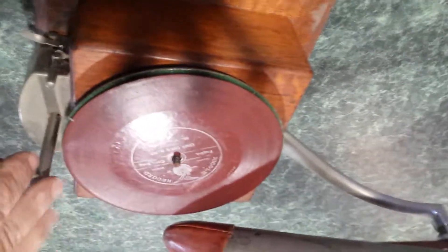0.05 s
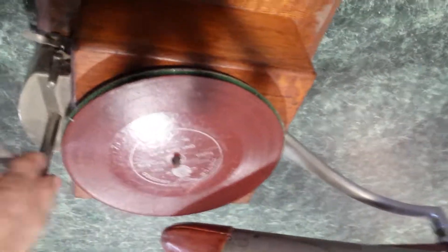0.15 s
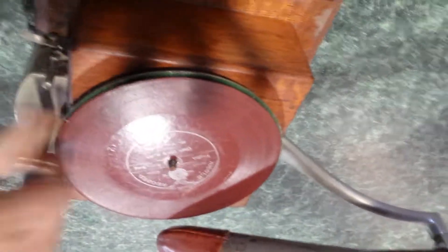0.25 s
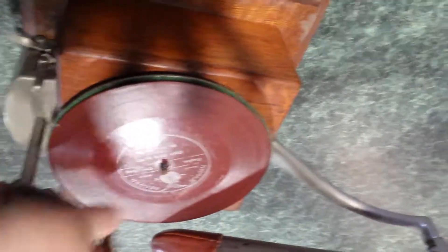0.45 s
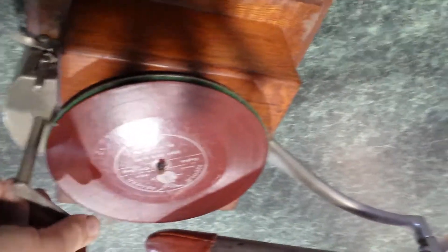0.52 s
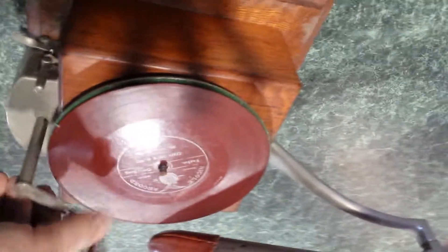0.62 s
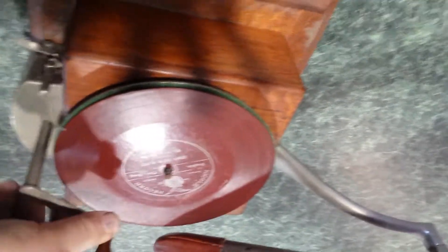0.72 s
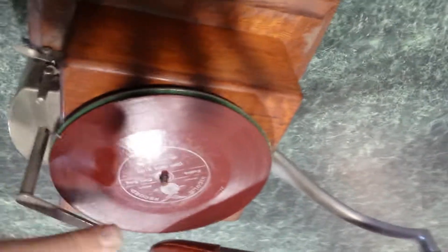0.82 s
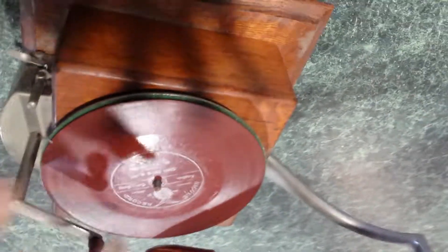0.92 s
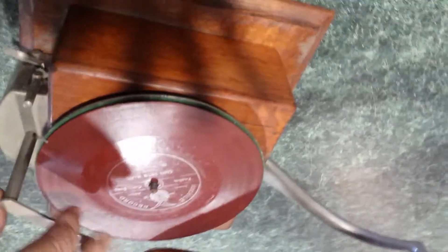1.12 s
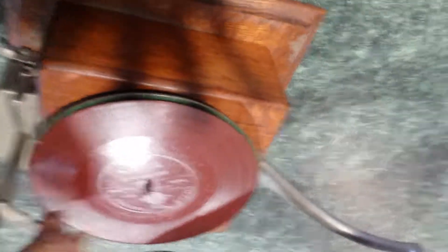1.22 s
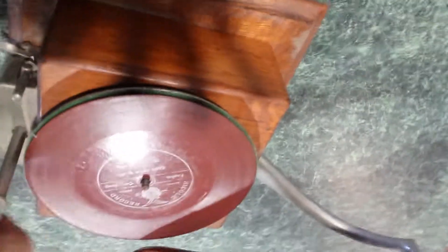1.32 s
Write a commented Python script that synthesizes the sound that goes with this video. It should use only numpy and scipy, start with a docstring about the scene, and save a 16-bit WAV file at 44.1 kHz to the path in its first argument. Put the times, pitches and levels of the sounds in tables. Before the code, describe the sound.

Sharp ratchet clicks from a wind-up gramophone being cranked, ending in one heavy clack.

```python
"""In a small quiet room, the crank of a wind-up gramophone is turned close by.
A steel pawl snaps over the ratchet teeth; each impact chatters and excites briefly ringing modes.
The wooden case creaks under the load of the spring, and the mechanism catches with one heavy clack.
The gears rumble softly while the hand turns, the handle ticks in its play, and the case bumps once more."""
import sys
import numpy as np
from scipy import signal
from scipy.fft import rfft, irfft
from scipy.io import wavfile
from scipy.ndimage import uniform_filter1d, minimum_filter1d

SR = 44100
rng = np.random.default_rng(int(sys.argv[2]) if len(sys.argv) > 2 else 0)


def wrap_up_sound(samples):
    """Save the sound to the file named by the first command line argument, as 16-bit audio."""
    columns = np.atleast_2d(samples).T
    # keep every value between -1 and 1, then stretch to whole-number steps
    tamed = np.clip(columns, -1, 1)
    steps = np.round(tamed * 32767).astype(np.int16)
    wavfile.write(sys.argv[1], SR, steps)


N = 59535
FREQS_HZ = np.maximum(np.fft.rfftfreq(N, 1 / SR), 1)


def undb(db):
    """Amplitude ratio of a level in decibels."""
    return 10 ** (np.asarray(db) / 20)


def since(start):
    """Elapsed time in seconds, zero before the start."""
    return np.maximum(np.arange(N) / SR - start, 0)


def fade(t, t60):
    """Exponential damping: the level falls 60 dB in t60 seconds."""
    return np.exp(-np.log(1000) * t / max(t60, 1e-4))


def noise(spectrum, top_db=0, edge_hz=8700, edge_width_hz=1200):
    """Spectral shaping: unit-variance noise with a given spectrum and a treble shelf."""
    hz, db = np.array(spectrum).T
    shelf_db = top_db * np.clip((FREQS_HZ - edge_hz) / edge_width_hz + .5, 0, 1)
    gain = undb(np.interp(np.log(FREQS_HZ), np.log(hz), db) + shelf_db)
    shaped = irfft(rfft(rng.standard_normal(N)) * gain, N)
    return shaped / shaped.std()


def contact(start, hold, t60, rise=0.00049):
    """Envelope of an impact: linear rise, hold, exponential decay (times in seconds)."""
    t = since(start)
    return np.minimum(t / rise, 1) * fade(np.maximum(t - hold, 0), t60)


def ring(start, modes, rise, scatter_db=0, detune=0.0043):
    """Modal superposition: damped sinusoids, randomly detuned, build up during the contact."""
    t, out = since(start), 0
    for hz, db, t60 in modes:
        level_draw, pitch_draw, phase = rng.standard_normal(3)
        tone = np.sin(2 * np.pi * (hz * (1 + detune * pitch_draw) * t + phase))
        out = out + undb(db + scatter_db * level_draw) * tone * fade(np.maximum(t - rise, 0), t60)
    return out * np.minimum(t / rise, 1)


# spectrum of the room's background noise (frequency [Hz], level [dB])
AMBIENT_SPECTRUM = [(25, -21.5), (60, -6), (125, 2.5), (350, -6.5), (700, -5.5), (1100, -13.5), (1600, -14),
                    (3000, -19.5), (6400, -16.5), (9000, -31), (15000, -37)]

def ambient_noise():
    """Stationary noise: a faint floor, strongest in the bass."""
    return undb(-53) * noise(AMBIENT_SPECTRUM)


# reverberation bands (centre frequency [Hz], level [dB], t60 [s])
REVERB_BANDS = [(150, -13, 0.39), (398, -9, 0.24), (920, -6, 0.3), (1940, -11, 0.35), (4500, -11, 0.37),
                (6440, -13, 0.36), (9400, -15.5, 0.23), (14100, -11.5, 0.31)]

def room(direct, delay_s=0.0057):
    """Reverberation: early reflections from case and floor, then a diffuse tail decaying band by band."""
    t, late = since(0), since(delay_s)
    white, tail = rfft(rng.standard_normal(N)), 0
    log_centres = np.log([hz for hz, _, _ in REVERB_BANDS])
    for (_, db, t60), selector in zip(REVERB_BANDS, np.eye(len(REVERB_BANDS))):
        band = irfft(white * np.interp(np.log(FREQS_HZ), log_centres, selector), N)
        decay = fade(late, t60) * (late > 0)
        tail = tail + undb(db) * band * decay / np.linalg.norm(decay)
    spikes = rng.standard_normal(N) ** 3  # cubing leaves a few strong reflections
    early = spikes * fade(t, t60=0.025) * (t > delay_s / 2)
    impulse_response = tail + undb(-12.5) * early / np.linalg.norm(early)
    return direct + signal.fftconvolve(direct, impulse_response)[:N]


# spectrum of gears and shaft (frequency [Hz], level [dB])
GEAR_SPECTRUM = [(30, -29.5), (70, -3), (130, 2.5), (330, 1.5), (600, -12), (1200, -9.5), (2500, -18),
                 (4200, -22), (6400, -12), (8500, -26.5), (15000, -39)]
# their loudness as the crank moves (time [s], level [dB])
GEAR_ENVELOPE = [(0, -44.5), (.07, -43), (0.122, -45), (.2, -41.5), (.34, -44.5), (.65, -46.5), (.9, -46.5),
                 (1.0, -59), (1.131, -56.5), (1.17, -43.5), (1.26, -51.5), (1.35, -52.5)]

def gears():
    """Amplitude-modulated noise: the winding gears rumble and the shaft hisses, unevenly."""
    times, db = np.array(GEAR_ENVELOPE).T
    uneven = uniform_filter1d(rng.standard_normal(N), size=600)
    flutter_db = 1.5 * uneven / uneven.std()
    return noise(GEAR_SPECTRUM) * undb(np.interp(since(0), times, db) + flutter_db)


# light taps of the handle (time [s], level [dB], centre frequency [Hz])
HANDLE_TAPS = [(0.1674, -29, 1630), (0.2513, -34.5, 5000), (.284, -45, 7000), (0.528, -35, 930),
               (1.017, -52, 6000), (1.025, -47, 1140)]

def handle_taps(skirt_db=-22):
    """Backlash: play in the handle makes faint ticks, each a damped band of noise."""
    out = 0
    for start, db, hz in HANDLE_TAPS:
        band = [(hz / 4, skirt_db / 2), (hz, 0), (hz * 2, skirt_db), (hz * 4, 2 * skirt_db)]
        out = out + undb(db) * noise(band) * contact(start, hold=0.0014, t60=0.063)
    return out


# dull knocks of the case (time [s], level [dB], rise [s], t60 [s], panel mode gain [dB])
CASE_KNOCKS = [(.033, -44.5, 0.0045, 0.07, 7.5), (.064, -42.5, 0.0055, 0.034, 4),
               (.692, -32, 0.024, 0.17, 2.5), (1.157, -39, 0.0026, 0.21, -24)]
# low modes of the wooden body (frequency [Hz], level [dB], multiple of the knock's t60 [1])
BODY_RESONANCES = [(130.5, 0.5, 1), (147, 0.5, 0.84), (194.5, -2, 0.91), (243.5, -5, 0.94)]
# higher modes of its panels (frequency [Hz], level [dB], multiple of the knock's t60 [1])
PANEL_RESONANCES = [(352, -14, 3), (430, -8, 0.28), (510.6, -0.5, 0.37), (602, -9.5, 2.3)]

def case_knocks():
    """Modal excitation: the case rocks under the hand, and soft pushes ring its body and panels."""
    out = 0
    for start, level_db, rise, t60, panel_db in CASE_KNOCKS:
        body = [(hz, db, t60 * factor) for hz, db, factor in BODY_RESONANCES]
        panels = [(hz, db + panel_db, t60 * factor) for hz, db, factor in PANEL_RESONANCES]
        out = out + undb(level_db) * ring(start, body + panels, rise, scatter_db=-1.5, detune=0.0068)
    return out


# spectrum of the creaking wood (frequency [Hz], level [dB])
CREAK_SPECTRUM = [(50, -31), (125, 6.5), (210, -5), (320, -23), (430, -20), (510, 0), (620, 1.5),
                  (760, -9.5), (1300, -17), (3000, -21), (6000, -25), (12000, -43)]

def case_creak(peak_s=0.704, width_s=0.017):
    """Friction: wood rubs briefly as the spring loads the case before the catch."""
    swell = np.exp(-.5 * ((since(0) - peak_s) / width_s) ** 2)
    return undb(-31.5) * noise(CREAK_SPECTRUM) * swell


# the heavy catch and its rebound (time [s], level [dB], hold [s])
CATCH_IMPACTS = [(0.7587, -6.5, 0.0043), (0.7735, -23, 0.014)]
# spectrum of that contact (frequency [Hz], level [dB])
CATCH_SPECTRUM = [(150, -34), (300, 7), (480, -3), (850, 1), (1150, -12.5), (2000, -1.5), (3000, -3.5),
                  (5500, 2), (8400, 0), (9300, -9.5), (11500, -17.5), (15000, -32)]
# modes of crank and case (frequency [Hz], level [dB], t60 [s])
CRANK_MODES = [(304, -10, 0.17), (595, -16, .04), (774, -10.5, 0.024), (937, -12.5, 0.035),
               (1360, -7, 0.048), (1851, -0.5, 0.019), (2155, -6.5, 0.054), (2280, -25, 0.033),
               (2805, -5.5, 0.037), (3350, -16, 0.026), (4744, 5.5, .022), (5618, 10, 0.01),
               (6580, -6, 0.024), (8208, -1.5, 0.014), (8395, -1.5, .025)]

def catch(ring_start_s=.761):
    """Impact and rebound: the mechanism catches hard, ringing crank and case and shaking loose parts."""
    clack = sum(undb(db) * noise(CATCH_SPECTRUM) * contact(start, hold, t60=0.011, rise=0.0032)
                for start, db, hold in CATCH_IMPACTS)
    buzz = undb(-23.5) * noise(CATCH_SPECTRUM, top_db=-6) * contact(ring_start_s, hold=0.0068, t60=0.33)
    ringing = undb(-12) * ring(ring_start_s, CRANK_MODES, rise=0.0015)
    return clack + buzz + ringing


# spectrum of the case shaken by a snap (frequency [Hz], level [dB])
WOOD_SPECTRUM = [(100, -17), (200, -3), (500, -6.5), (630, -6.5), (820, -3), (1130, -6.5), (1450, -5.5),
                 (2400, -9), (3500, -4), (6000, -20), (12000, -38)]
# modes of the side wall that carries the crank (frequency [Hz], level [dB], t60 [s])
SIDE_WALL_MODES = [(642, 0, 0.077), (766, -3, 0.059), (1420, 4.5, .04), (1790, 1, .035)]

def case_response(start, rise_s=0.0043):
    """Structure-borne sound: the wooden body and side wall radiate a snap of the pawl."""
    body = undb(-28.5) * noise(WOOD_SPECTRUM) * contact(start, hold=rise_s, t60=0.07, rise=rise_s)
    wall = undb(-35) * ring(start, SIDE_WALL_MODES, rise_s, detune=0.018)
    return body + wall


# snaps of the pawl (time [s], level [dB], hold [s], treble shelf [dB],
# tooth ring frequency [Hz], tooth ring gain [dB], case gain [dB])
PAWL_SNAPS = [(0.1999, -26, 0.0017, -10, 6180, -4, 1), (0.2332, -14, 0.01, -25.5, 4646, 2, 9.5),
              (0.3575, -1, 0.0036, 3, 6670, -13, -2), (.4243, -1, 0.0031, 4, 6500, 5.5, 3.5),
              (0.4854, 1, .003, 9, 6050, -1.5, -3), (0.5378, -0.5, 0.0044, -2.5, 6730, 2, 1),
              (0.6197, -1, 0.0062, 1.5, 5326, -3, -3.5), (1.3425, -21.5, 0.0089, -15, 8000, 3, 10)]
# first hard tick of steel on steel (frequency [Hz], level [dB])
TICK_SPECTRUM = [(1000, -20), (4000, -9), (6500, -1.5), (9700, 0.5), (11000, -17.5), (15000, -8)]
# gritty chatter of the pawl's contact (frequency [Hz], level [dB])
CHATTER_SPECTRUM = [(200, -50), (480, -26.5), (700, -12.5), (1100, -17.5), (1600, -13.5), (2400, -17),
                    (3400, -11.5), (4600, -2.5), (6400, 0), (8200, -8), (11000, -14.5), (15000, -17.5)]
# modes of the steel pawl (frequency [Hz], level [dB], t60 [s])
STEEL_MODES = [(3986, -4.5, 0.028), (4870, -8.5, 0.0083), (5535, -1.5, 0.021), (5790, 6.5, 0.015),
               (6235, -5, 0.015), (6924, 5, 0.0088), (7840, -9, 0.016), (8470, -12, 0.014),
               (9650, -3.5, 0.019)]
# loose parts of the winding gear buzzing after a snap (frequency [Hz], level [dB])
BUZZ_SPECTRUM = [(1000, -21), (3000, -13.5), (4600, -2.5), (5600, 3), (6400, 1.5), (7800, -3.5),
                 (9700, -12), (11000, -15.5), (15000, -23)]

def pawl(skirt_db=-24):
    """Impact excitation: the pawl falls onto each tooth; steel rings, and wood and loose parts respond."""
    out = 0
    for start, db, hold, top_db, hz, tooth_db, case_db in PAWL_SNAPS:
        tick = undb(-12) * noise(TICK_SPECTRUM, top_db) * contact(start, hold=0.0013, t60=0.0045)
        chatter = undb(-13.5) * noise(CHATTER_SPECTRUM, top_db) * contact(start, hold, t60=0.013)
        steel = undb(-16.5) * ring(start, STEEL_MODES, rise=.0008, scatter_db=1.5, detune=.014)
        # one ring depends on where the pawl lands and shimmers on as narrow-band noise
        tooth = undb(-7.5) * ring(start, [(hz, tooth_db, .016)], rise=0.0013)
        band = [(hz / 2, 2 * skirt_db), (hz * 0.86, skirt_db), (hz, 0),
                (hz * 1.37, skirt_db), (hz * 2, 2 * skirt_db)]
        shimmer = undb(-31.5) * noise(band) * contact(start, hold, t60=0.23)
        wood = undb(case_db) * case_response(start)
        buzz = undb(-27.5) * noise(BUZZ_SPECTRUM, top_db) * contact(start, hold, t60=0.21)
        out = out + undb(db) * (tick + chatter + steel + tooth + shimmer + buzz + wood)
    return out


def scene():
    """Superposition: the contact sounds reverberate in the room, over gear rumble and ambient noise."""
    contacts = pawl() + catch() + case_knocks() + case_creak() + handle_taps()
    return (room(contacts) + gears() + ambient_noise())[None]


def record(dry, cutoff_hz=15500, ceiling=.85, window_s=.001):
    """Peak limiting: a fast gain dip holds down the loudest peaks, between two low-pass filters."""
    lowpass = signal.ellip(10, .2, 80, cutoff_hz, fs=SR, output="sos")
    band = signal.sosfilt(lowpass, dry)
    size = int(window_s * SR)
    needed_gain = ceiling / np.maximum(np.abs(band), ceiling)
    smooth_gain = uniform_filter1d(minimum_filter1d(needed_gain, size=size), size=size)
    return signal.sosfilt(lowpass, band * smooth_gain)


dry = scene()
out = record(dry)
wrap_up_sound(out)
```